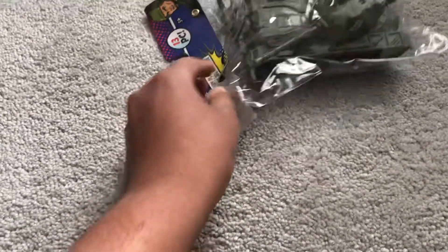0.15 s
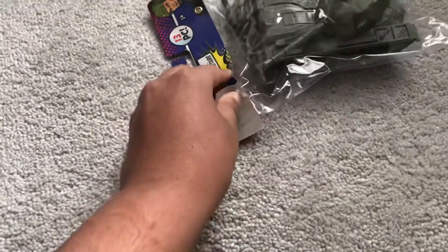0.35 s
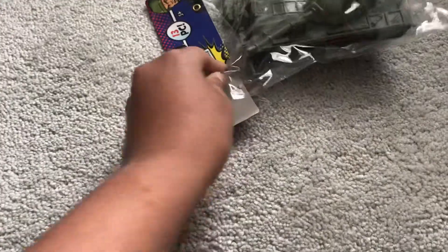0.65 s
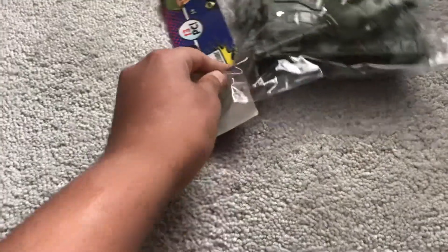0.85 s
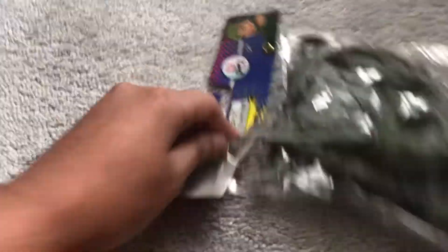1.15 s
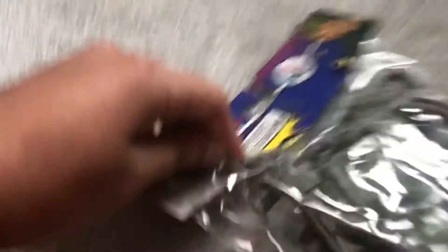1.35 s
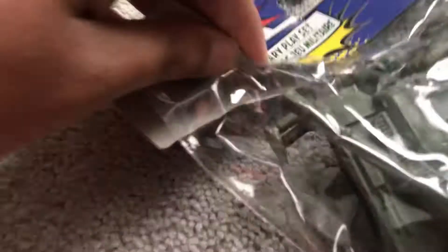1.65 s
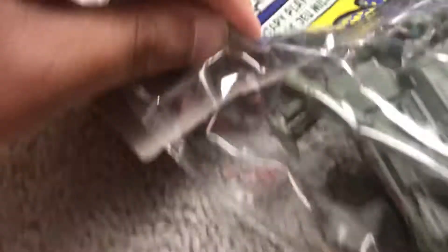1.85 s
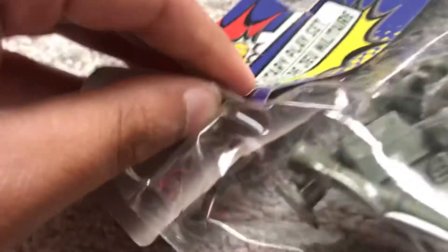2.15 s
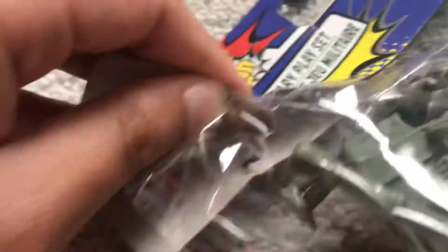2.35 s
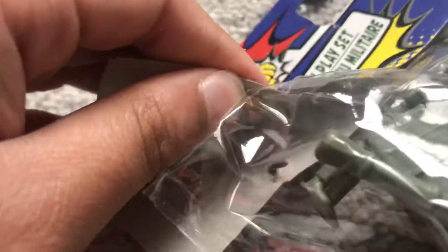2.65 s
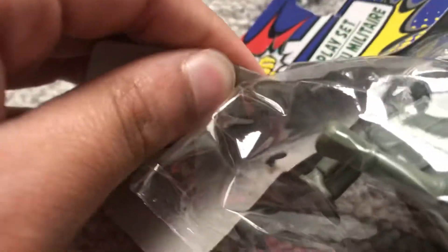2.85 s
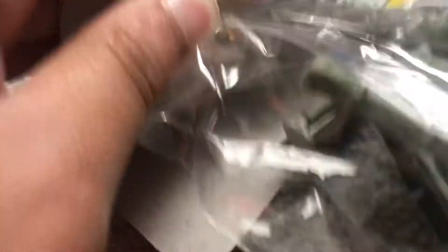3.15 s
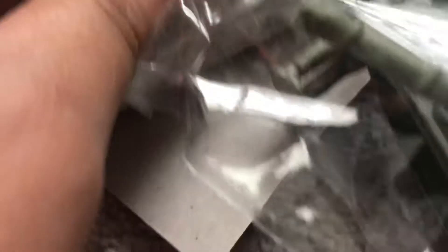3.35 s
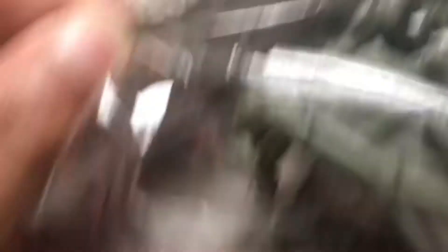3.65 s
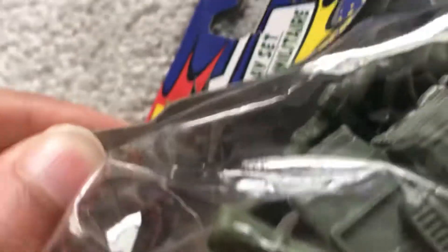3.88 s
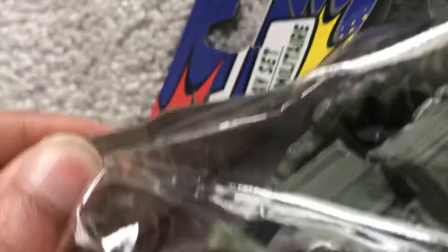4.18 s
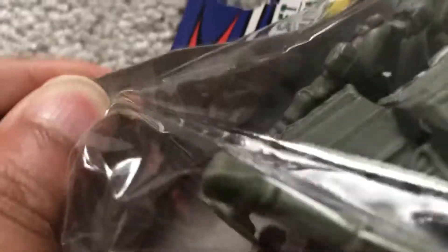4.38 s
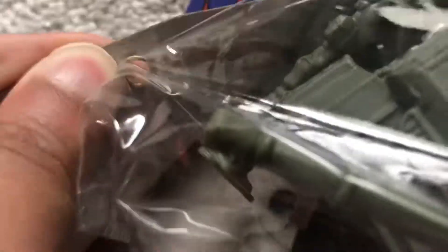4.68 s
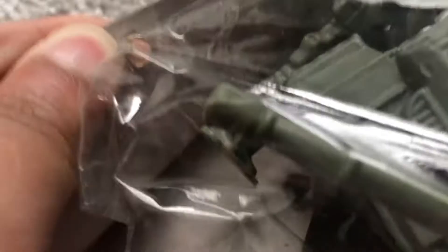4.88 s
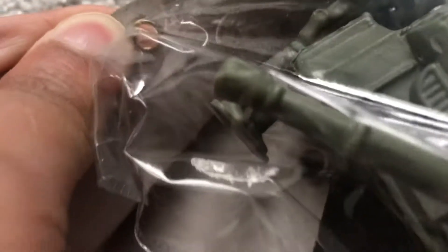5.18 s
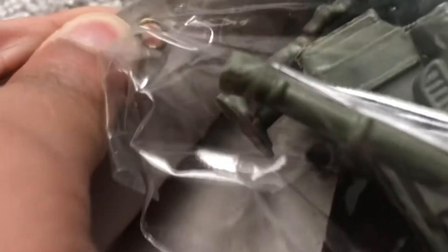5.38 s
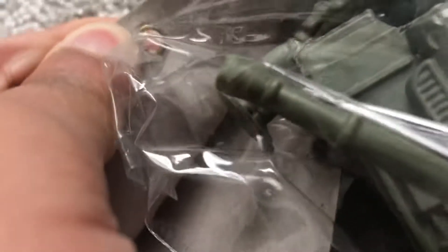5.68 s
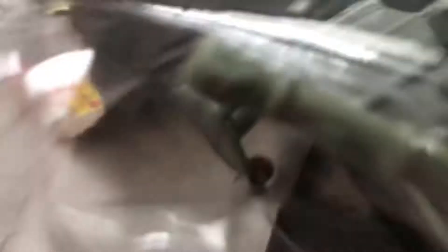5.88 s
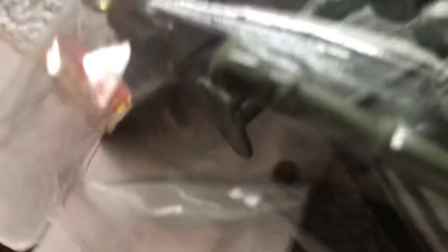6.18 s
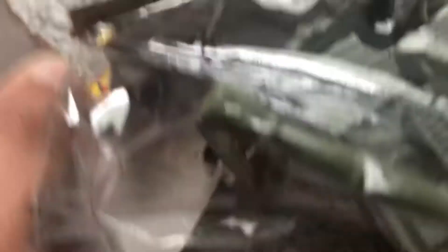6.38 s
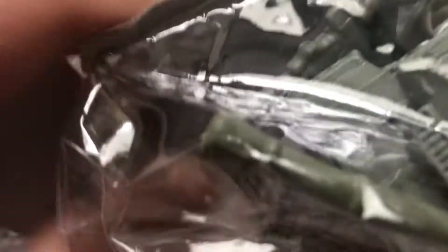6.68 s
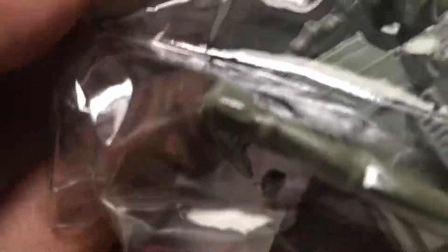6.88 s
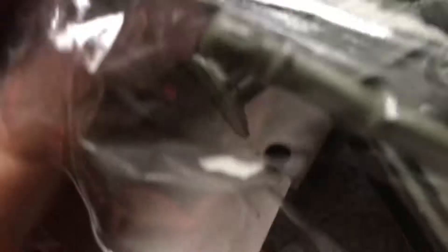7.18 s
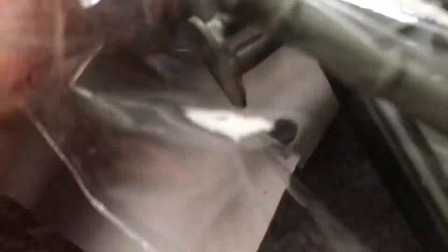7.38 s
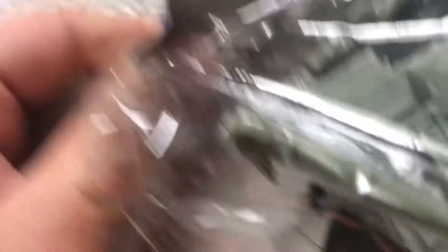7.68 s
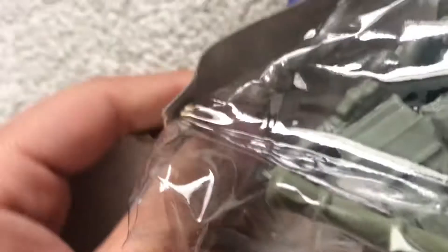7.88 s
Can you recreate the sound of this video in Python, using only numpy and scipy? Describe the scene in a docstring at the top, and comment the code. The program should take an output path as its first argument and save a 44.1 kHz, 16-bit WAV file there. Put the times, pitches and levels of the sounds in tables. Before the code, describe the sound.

Thin plastic bag dragged on carpet, then handled very close, crackling and snapping in dense crinkles, with one short sharp rip late on.

```python
"""Sharp snaps and rubbing come first: a hand drags a thin plastic bag of toys over a carpet and pulls at it.
Creases buckle in snaps, each unsettling a neighbour, while small crinkles go off at random in between.
Each stroke of the hand makes the film scrape, hiss and crackle; fingertips skid in short scuffs.
The bag comes close after a moment. Later the film rips with a burst, a run of tiny breaks and a low puff.
A small, damped room answers faintly over a low hum."""
import sys
import numpy as np
from scipy import signal
from scipy.fft import irfft
from scipy.io import wavfile
from scipy.ndimage import uniform_filter1d

SR = 44100
rng = np.random.default_rng(int(sys.argv[2]) if len(sys.argv) > 2 else 0)


def file_out(sig):
    """Save sig as 16-bit WAV at sys.argv[1]."""
    # one column per channel
    cols = np.atleast_2d(sig).T
    # limit, then scale
    lim = np.clip(cols, -1, 1)
    pcm = np.round(lim * 32767).astype(np.int16)
    wavfile.write(sys.argv[1], SR, pcm)


N = 354123  # length in samples
TIME = np.arange(N) / SR  # seconds
TAPS = 2048  # size of the short filters, in samples
BINS = np.fft.rfftfreq(TAPS, 1 / SR) + 1  # Hz, raised by 1 to avoid zero


def amp(db):
    """Turns decibels into a gain."""
    return 10 ** (np.asarray(db) / 20)


def unit(x):
    """Scales a sound to an rms level of 1."""
    return x / np.sqrt(np.mean(x ** 2) + 1e-20)


def read(points, hz):
    """Reads a table between its points, along a log-frequency axis."""
    f, value = np.transpose(points)
    return np.interp(np.log(hz + 1), np.log(f + 1), value)


def add(mix, start_s, sound):
    """Mixes a sound in at its start time."""
    part = mix[max(round(start_s * SR), 0):][:len(sound)]
    part += sound[:len(part)]


def causal(db):
    """Spectrum of the most abrupt pulse that has this colour (minimum phase)."""
    log_gain = np.log(amp(np.maximum(db, db.max() - 100)))
    circle = np.concatenate([log_gain, log_gain[-2:0:-1]])
    return np.exp(np.conj(signal.hilbert(circle)))[:len(db)]


def colour(x, points):
    """Filters a sound to the colour in a table, at rms 1."""
    pulse = irfft(causal(read(points, BINS)))
    return unit(signal.oaconvolve(x, pulse)[:N])


def low_noise(hz):
    """A dull band of noise from an octave below hz to an octave above."""
    band = signal.butter(2, [hz / 2, hz * 2], "band", fs=SR, output="sos")
    return unit(signal.sosfilt(band, rng.standard_normal(N)))


# colour of the room's hum: pitch_hz, level_db (per Hz)
HUM_COLOUR = [(25, -14.5), (65, 3.5), (150, -8), (230, -4.5), (500, -17), (4000, -26), (15000, -51)]


def room_hum(level_db=-59):
    """A steady low hum: noise shaped mostly into the bass."""
    return amp(level_db) * colour(rng.standard_normal(N), HUM_COLOUR)


# how near the bag is: time_s, closeness (0 to 1)
BAG_CLOSENESS = [(1.1, 0.25), (2.3, 1)]


def closeness():
    """How near the bag is at each sample: it starts at arm's length, then comes close."""
    time_s, near = np.transpose(BAG_CLOSENESS)
    return np.interp(TIME, time_s, near)


# how long the room takes to fade by 60 dB, before the early boost: pitch_hz, fade_s
ROOM_FADE = [(150, 0.26), (3000, 0.17), (15000, 0.13)]


def room(x, far_db=-12, near_db=-25, first_s=0.0043, early_db=6, early_s=0.051,
         boom_db=7, boom_hz=300, dull_hz=6000):
    """Sparse reflections, strongest at first, fade at a speed set by pitch; fainter beside a close bag."""
    reflections = rng.standard_normal(SR) * (rng.random(SR) < 4000 / SR)  # about 4000 a second
    hz, t, z = signal.stft(reflections, SR)
    hz = hz[:, None]
    fade_db = -60 * t / read(ROOM_FADE, hz)
    early_boost_db = early_db * np.exp(-t / early_s)
    bass_boost_db = boom_db / (1 + (hz / boom_hz) ** 2)
    z = z * amp(fade_db + early_boost_db + bass_boost_db)
    z = z / np.hypot(1, hz / dull_hz)  # the carpet swallows treble
    tail = signal.istft(z, SR)[1][:SR] * (TIME[:SR] > first_s)
    sent = x * amp(far_db + (near_db - far_db) * closeness())
    return signal.fftconvolve(sent, tail / np.linalg.norm(tail))[:N]


def film(echo=0.51, echo_s=.0012, reach_s=0.0045, dull_hz=7000, count=10):
    """Bending waves reach the air directly and from nearby folds; treble runs ahead of bass."""
    late_s = reach_s * (np.arange(count) + rng.uniform(0.09, 1, count))[:, None] / count
    sign = rng.choice([-1, 1], (count, 1))
    loss = late_s / echo_s * np.sqrt(1 + BINS / dull_hz) / 2
    echoes = echo * sign * np.exp(-loss - 2j * np.pi * BINS * late_s)
    paths = 1 + echoes.sum(0)
    # even out the broad colour, keep the fine ripples
    paths /= np.sqrt(uniform_filter1d(abs(paths) ** 2, size=45))
    # in a bending sheet the delay goes as 1 / sqrt(frequency), so every snap droops in pitch
    delay_s, at_hz = .002, 400
    return paths * np.exp(-4j * np.pi * delay_s * np.sqrt(at_hz * BINS))


def slips(per_s, spread_db):
    """A random train of tiny slips, most small and a few large."""
    size = amp(spread_db * np.minimum(rng.exponential(1, N), 4))
    happens = rng.random(N) < per_s / SR
    return unit(size * rng.choice([-1, 1], N) * happens)


def crackle(per_s, spread_db, count=8):
    """Tiny slips spread over patches of the film: wide patches sound low, narrow ones high."""
    out = np.zeros(N)
    for patch_hz in np.geomspace(500, 16000, count):
        band_db = -20 * np.log10(1 + np.log2(BINS / patch_hz) ** 4)
        pulse = irfft(causal(band_db) * film())[:TAPS // 2]
        out += signal.oaconvolve(slips(per_s / count, spread_db), pulse)[:N]
    return unit(out)


# strokes of the hand that slide the film:
# start_s, length_s, scrape_db and hiss_db (peaks, before the trims in rubbing), crackle_share (0 to 1)
HAND_STROKES = [(-.16, .3, -45, -54, .3), (.1, .24, -51, -59, .4), (.35, .11, -48, -58, .5),
                (.5, .25, -50, -64, .3), (.68, .6, -49, -50.5, .06), (1, .54, -53, -55, .04),
                (1.54, .33, -55, -64.5, .04), (2.139, .4, -58, -65, .1), (2.53, .28, -51, -54.5, .85),
                (2.82, .26, -57, -55.5, .5), (3.03, .4, -49, -59, .7), (3.56, .25, -50, -50, .25),
                (3.9, .56, -57, -66, .3), (4.359, 1.2, -62.5, -63, .3), (5.3, .72, -56, -59, .35),
                (6.02, .3, -58, -65.5, .3), (6.21, .23, -45, -51, .5), (6.408, .42, -47, -43, .6),
                (6.7, .46, -54, -56, .5), (7.07, .6, -53, -43, .92), (7.6, .37, -52, -48, .8)]


def hand(arch=1.35, held_scrape_db=-73, held_hiss_db=-69, held_catch=.1):
    """Scrape dB, hiss dB and crackle share at each sample: each stroke speeds up and slows down in one arch."""
    # the film creeps even while it is only held
    scrape, hiss = np.full(N, amp(held_scrape_db)), np.full(N, amp(held_hiss_db))
    caught = held_catch * scrape
    for start_s, length_s, scrape_db, hiss_db, catch in HAND_STROKES:
        during = (TIME > start_s) & (TIME < start_s + length_s)
        speed = abs(np.sin(np.pi * (TIME[during] - start_s) / length_s)) ** arch
        scrape[during] += amp(scrape_db) * speed
        hiss[during] += amp(hiss_db) * speed
        caught[during] += catch * amp(scrape_db) * speed
    return 20 * np.log10(scrape), 20 * np.log10(hiss), np.clip(caught / scrape, 0, 1)


def sliding(unsteady_db=3.5, grip_s=0.022):
    """Smooth sliding hisses; where the film catches, it breaks up into crackle and flutters with the grip."""
    share = hand()[2]
    pressure = np.interp(TIME / grip_s, np.arange(N), rng.standard_normal(N))
    grains = crackle(per_s=420, spread_db=6)
    smooth = rng.standard_normal(N)
    drive = np.sqrt(share) * grains + np.sqrt(1 - share) * smooth
    return drive * amp(unsteady_db * np.sqrt(2 * share) * pressure)


# colours of the two parts of sliding: pitch_hz, level_db (per Hz)
SCRAPE_COLOUR = [(100, -17), (520, -12), (950, 2.5), (1500, -5), (2800, -6), (10000, -24.5)]
HISS_COLOUR = [(1200, -70.5), (2500, 6), (4200, 7), (6500, 5.5), (9000, 4), (11000, 0.5), (14000, 4),
               (16000, -3.5)]


def rubbing(scrape_trim_db=-4, hiss_trim_db=-2, body_db=-4.0, body_hz=285):
    """Scrape and hiss of the moving film; where it catches close by, the flexing bag also rumbles."""
    scrape_db, hiss_db, share = hand()
    catching = np.sqrt(np.minimum(2 * share, 1))
    body = amp(body_db) * closeness() * catching * low_noise(body_hz)
    scrape = amp(scrape_trim_db) * colour(sliding(), SCRAPE_COLOUR)
    hiss = colour(sliding(), HISS_COLOUR)
    return amp(scrape_db) * (scrape + body) + amp(hiss_db + hiss_trim_db) * hiss


# short stick-slip runs under the fingertips: middle_s, length_s, level_db
SCUFF_RUNS = [(0.561, 0.0097, -37.5), (0.677, 0.026, -33), (3.11, 0.021, -49.5), (6.294, 0.014, -33.5),
              (6.378, 0.023, -36), (6.641, 0.054, -41), (6.745, 0.033, -37.5)]
# colour of a scuff: pitch_hz, level_db (per Hz)
SCUFF_COLOUR = [(40, -24), (250, 6.5), (500, -14.5), (1000, -11.5), (4500, -12), (16000, -29.5)]


def scuffs():
    """A fingertip skids a short way in a dense run of slips."""
    swell = np.zeros(N)
    for middle_s, length_s, level_db in SCUFF_RUNS:
        swell += amp(level_db) * np.exp(-2 * (2 * (TIME - middle_s) / length_s) ** 2)
    return swell * colour(crackle(per_s=2800, spread_db=6), SCUFF_COLOUR)


# colour of the tear: pitch_hz, level_db (per Hz)
TEAR_COLOUR = [(40, -33), (170, -6.5), (1200, -3.5), (1900, -10.5), (4300, -7.5), (9000, -15.5),
               (16000, -17.5)]


def rip(start_s=5.748, rise_s=0.0098, burst_db=-8, burst_s=.02, run_db=-20, run_s=.058,
        puff_s=5.762, puff_db=-26, puff_decay_s=0.036, puff_hz=105):
    """The film bursts, the tear runs on in tiny breaks and stalls; the slack bag lets go a low puff of air."""
    age_s = np.maximum(TIME - start_s, 0)
    burst = amp(burst_db) * np.exp(-(age_s / burst_s) ** 4)
    run_on = amp(run_db) * np.exp(-(age_s / run_s) ** 4)
    rise = np.minimum(age_s / rise_s, 1) ** 3
    breaks = colour(crackle(per_s=6600, spread_db=0.5), TEAR_COLOUR)
    tear = rise * np.hypot(burst, run_on) * breaks
    puff = (TIME > puff_s) * np.exp(-abs(TIME - puff_s) / puff_decay_s)
    return tear + amp(puff_db) * puff * low_noise(puff_hz)


# how the film radiates a snap: pitch_hz, level_db (per Hz)
FILM_COLOUR = [(40, -35.5), (150, 0), (500, -5), (1000, 1), (2000, -4), (14000, -5)]


def snap(strength_db, ring_hz, bass_db, edge_hz, ring_db=9.5, ring_octaves=0.41, bass_hz=660):
    """A crease flips a panel of film, which rings for a few cycles and pushes a little air."""
    ring = ring_db / (1 + abs(np.log2(BINS / ring_hz) / ring_octaves) ** 3)
    push = bass_db / (1 + (BINS / bass_hz) ** 2)
    # the speed of the flip limits the treble
    loss = 10 * np.log10(1 + (BINS / edge_hz) ** 4.75)
    total_db = strength_db + read(FILM_COLOUR, BINS) + ring + push - loss
    return irfft(causal(total_db) * film())[:TAPS // 2]


def crinkles(over_db=29, spread_db=13, ring_hz=1400, edge_hz=2800, edge_octaves=1.72, sharp_db=-6, count=330):
    """Small creases flip at random, more often and harder where the film catches; quick ones are bright, weak."""
    out = np.zeros(N)
    scrape_db, _, share = hand()
    strain = np.cumsum(share * amp(scrape_db / 4))
    for when, force, size, speed in rng.random((count, 4)):
        at = np.searchsorted(strain, when * strain[-1])  # more strain, more crinkles
        quick = 2 * speed - 1  # -1 slow to 1 quick
        level_db = scrape_db[at] + over_db + spread_db * force ** 2 + sharp_db * quick
        panel_hz = ring_hz * 2 ** (2 * size - 1 + quick)
        add(out, at / SR, snap(level_db, panel_hz, 0, edge_hz * 2 ** (edge_octaves * quick)))
    return out


# the creases that buckle audibly:
# start_s, strength_db, ring_hz (of the panel), bass_db (push of air), edge_hz (where treble falls off)
CREASE_SNAPS = [(0.0338, 7, 5420, -11.5, 1426), (0.1292, 6, 3140, -19, 6750), (.1543, 10.5, 268, -16, 5900),
                (0.1959, -7, 3870, -11, 6700), (0.2535, -1.5, 3520, -13, 6550),
                (0.282, 1.5, 3760, -5.5, 6260), (0.3746, -3.5, 2440, -12, 7100), (.4, -5, 3200, -23, 5340),
                (0.415, 0.5, 3330, -16, 11500), (0.5472, 7.5, 845, -22.5, 18000),
                (.726, -12, 2580, -17, 2900), (0.8839, 0.5, 284, -8, 10200), (1.464, -21.5, 614, 23, 4855),
                (1.7428, -15, 3500, 9, 18000), (1.8214, -10, 653, 0.5, 1810),
                (1.9855, -17.5, 530, 3, 14900), (2.0935, -4.5, 1050, 17, 2720),
                (2.1254, 8, 910, -4.5, 1280), (2.1448, -19.5, 7000, -7, 13000),
                (2.265, -4.5, 390, 1.5, 1870), (2.325, -3, 7330, 4, 1100), (2.4266, 10.5, 3520, -6, 5430),
                (2.4344, 8.5, 3250, -5, 1700), (2.4529, 12, 1190, -1, 4600), (2.5486, 7.5, 3870, -9, 18000),
                (2.5767, 10.5, 710, -21.5, 8800), (2.5898, 0, 800, -5, 8400), (2.618, -4.5, 825, -2, 4700),
                (2.6514, -4.5, 1000, -3, 3480), (2.681, -3.5, 850, -0.5, 4580),
                (2.7365, 2.5, 2100, 3, 3960), (2.748, 0.5, 1120, 3, 2440), (2.8424, 16, 4140, -8, 5140),
                (2.8885, -19, 310, 25.5, 5300), (2.9534, 13, 295, -26, 8700),
                (3.0378, 14.5, 940, -14.5, 3880), (3.0955, 9, 2530, -3, 1700), (3.1244, 5.5, 780, 2, 10500),
                (3.1393, 13, 1510, 6.5, 9150), (3.15, 1, 4700, 5, 11500), (3.2443, 17, 5800, -9.5, 2320),
                (3.3199, 14.5, 337, 1, 12300), (3.3481, 12.5, 2760, -12.5, 18300),
                (3.3773, 18, 328, -24, 785), (3.487, 3, 340, 10, 1560), (3.5326, 3.5, 570, -32, 6500),
                (3.5982, 9, 3800, 2, 2870), (3.642, 10, 1260, -21, 2460), (3.711, 0.5, 527, 4, 2980),
                (4.1419, 2, 380, -6.5, 1330), (4.2095, -10, 915, 12.5, 2000),
                (4.2861, 10.5, 1580, -18, 1720), (4.307, 12.5, 3800, -25, 4600), (4.3376, 8, 400, -9, 1610),
                (4.3946, 6.5, 493, -0.5, 3600), (4.534, 5, 320, -3, 6350),
                (4.5754, 19.5, 4920, -31.5, 1220), (4.6184, -3.5, 270, 4, 4240),
                (4.6834, 2.5, 730, -5, 9500), (4.786, 2.5, 1040, 5, 2940), (4.847, 10.5, 1060, -28, 4500),
                (4.971, 5.5, 406, -5, 2330), (5.054, 8, 332, 2, 18100), (5.1725, 13, 360, -22.5, 1310),
                (5.208, -7.5, 603, 10, 2000), (5.372, 1.5, 3070, 15.5, 6100), (5.425, 11.5, 734, -9, 5130),
                (5.4338, 19, 1390, -26, 700), (5.4471, 21, 890, -28, 9800), (5.5159, -4, 270, -7, 12100),
                (5.5651, 6.5, 347, -6, 6600), (5.6123, 10.5, 5750, 5.5, 4200), (5.6317, 1, 3920, 13, 17700),
                (5.8161, 8, 1750, -7, 7500), (5.8238, 15.5, 686, -1.5, 6300), (5.832, 9, 2000, 2, 5000),
                (5.887, 6.5, 4970, -12, 2280), (5.9304, 11, 6370, -17, 4400), (6.0557, 13, 338, -6, 8800),
                (6.1418, 11, 290, -21.5, 1090), (6.191, -13, 1670, -13, 14900),
                (6.3173, 1.5, 525, 3.5, 7100), (6.5697, 9, 290, -18, 3000), (6.9754, 13.5, 347, -17, 2700),
                (7.1489, 9.5, 324, -2.5, 3080), (7.2001, 2, 4800, -6, 5560),
                (7.2554, 6.5, 4500, -5.5, 9700), (7.2659, 1, 2020, -5, 2900),
                (7.309, 5.5, 3760, -4.5, 6060), (7.3204, -0.5, 580, 19, 5000), (7.343, 15, 1100, -2, 6450),
                (7.4383, 15.5, 1100, -15.5, 4580), (7.4457, 10, 580, 0, 2200), (7.4569, 20, 450, -20, 1220),
                (7.4771, 23, 560, -14.5, 595), (7.56, 6.5, 3730, -2, 4800), (7.6631, 8, 1110, -31, 1900),
                (7.7285, 6, 3950, -5, 3420), (7.7752, 11, 1850, -23, 3450), (7.789, 5, 7300, -12, 6800),
                (7.8228, 8.5, 2760, 5.5, 12200)]


def snaps(lag_s=.02, follow_db=-14, follow_share=0.52, spread_db=7, ring_hz=1400, bass_db=-8, edge_hz=1700):
    """Big creases give way one by one; each sheds its load on a neighbour, which follows dully."""
    out = np.zeros(N)
    for start_s, strength_db, *panel in CREASE_SNAPS:
        add(out, start_s, snap(strength_db, *panel))
        wait, force, size = rng.uniform(-1, 1, 3)
        neighbour_db = follow_db + follow_share * strength_db + spread_db * force
        neighbour = snap(neighbour_db, ring_hz * 2 ** size, bass_db, edge_hz * 2 ** size)
        add(out, start_s + lag_s * 2 ** wait, neighbour)
    return out


def scene():
    """The hum of the room, the bag and the bag's echo."""
    hum = room_hum()
    bag = rubbing() + scuffs() + crinkles() + rip() + snaps()
    return (bag + room(bag) + hum)[None]


def record(dry):
    """Peaks beyond full scale are cut flat; then the top treble is filtered off."""
    clipped = np.clip(dry, -1, 1)
    lowpass = signal.firwin(255, 16300, window=("kaiser", 8), fs=SR)  # edge in Hz
    return signal.oaconvolve(clipped, lowpass[None], "same")


dry = scene()
out = record(dry)
file_out(out)
```